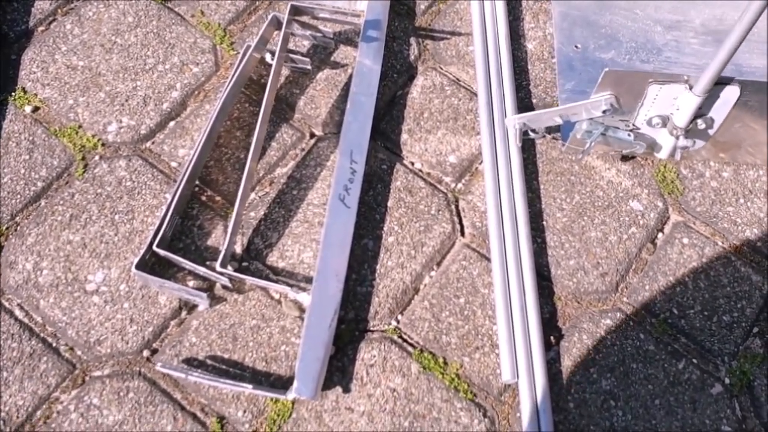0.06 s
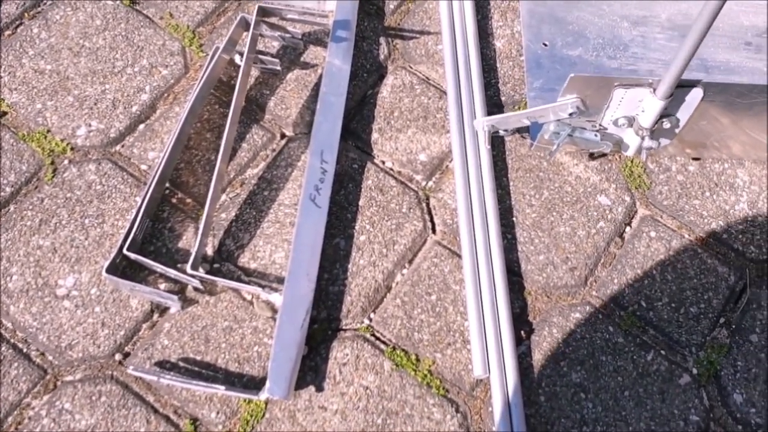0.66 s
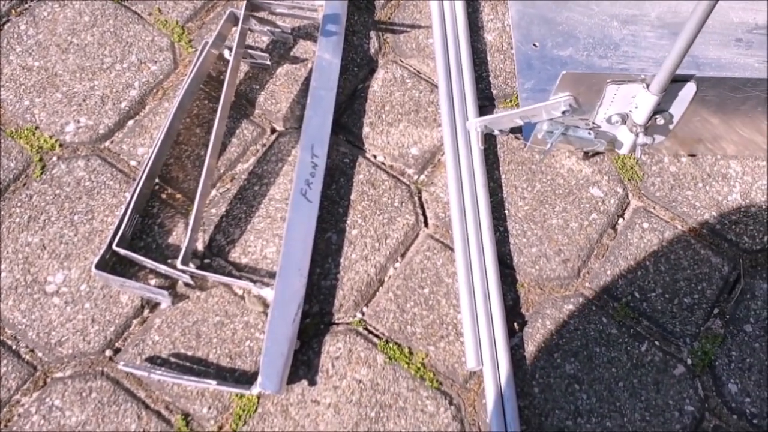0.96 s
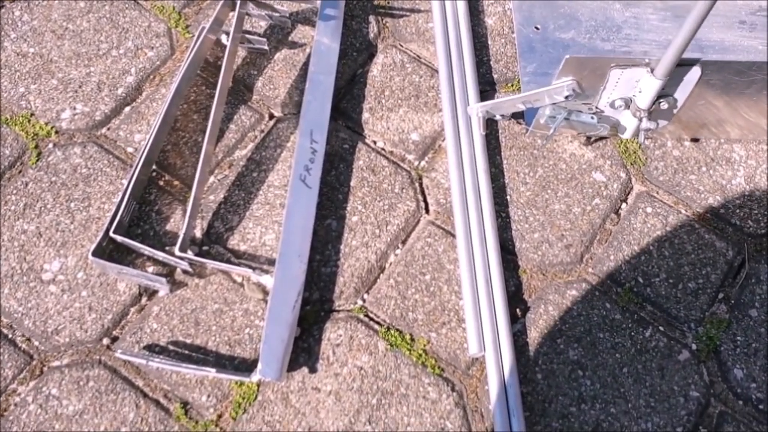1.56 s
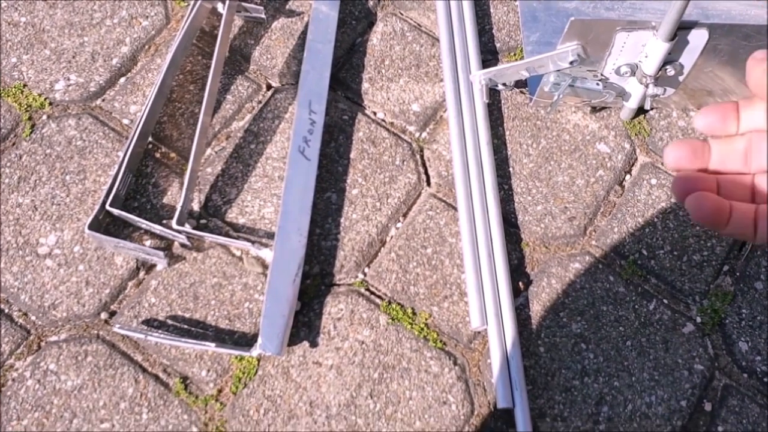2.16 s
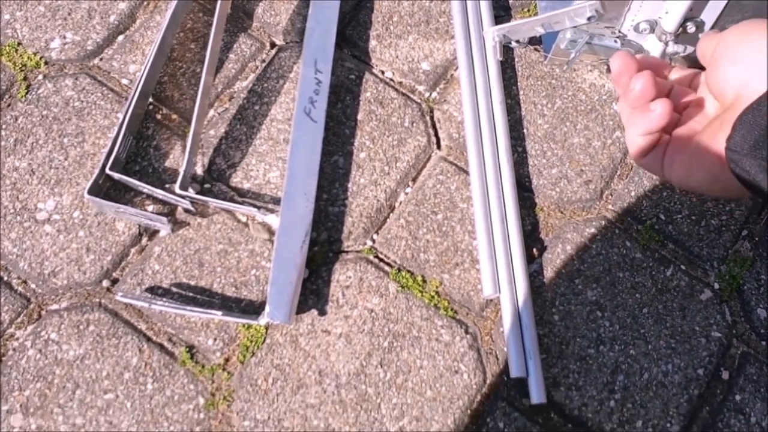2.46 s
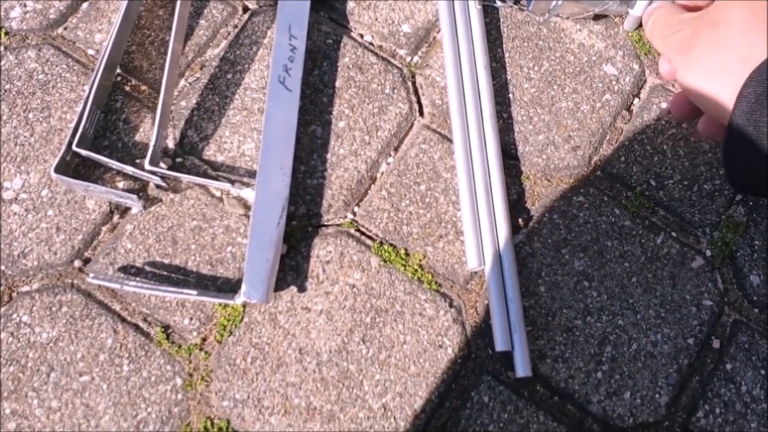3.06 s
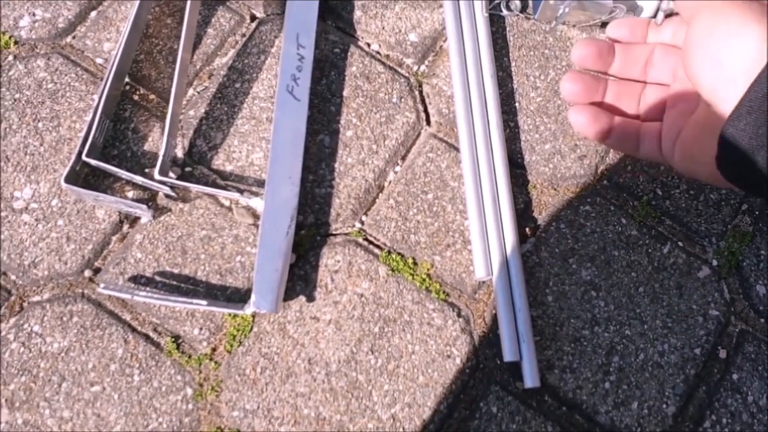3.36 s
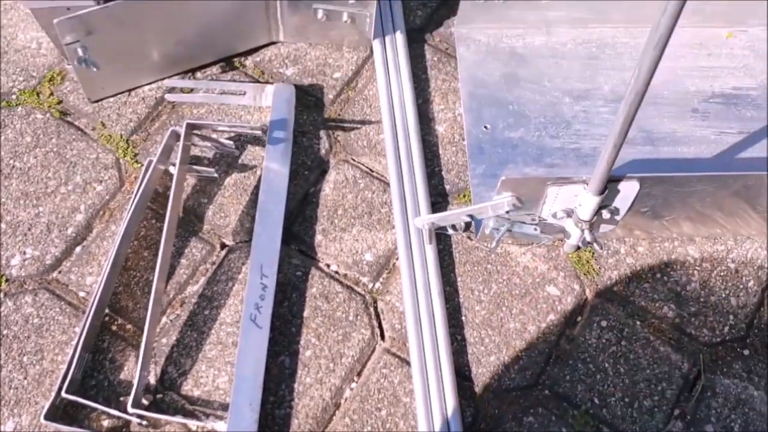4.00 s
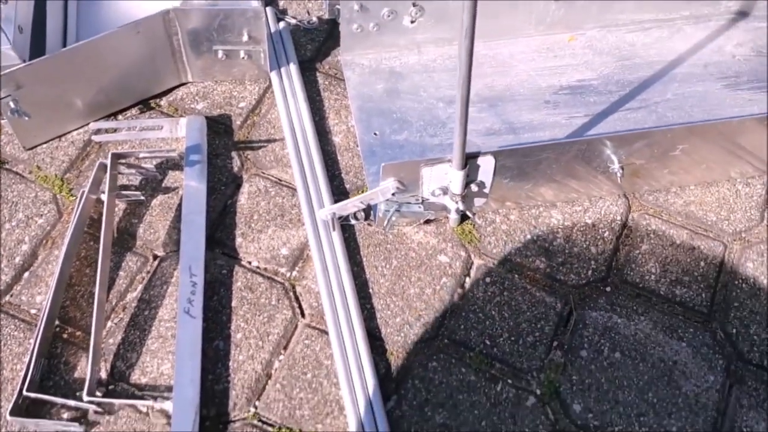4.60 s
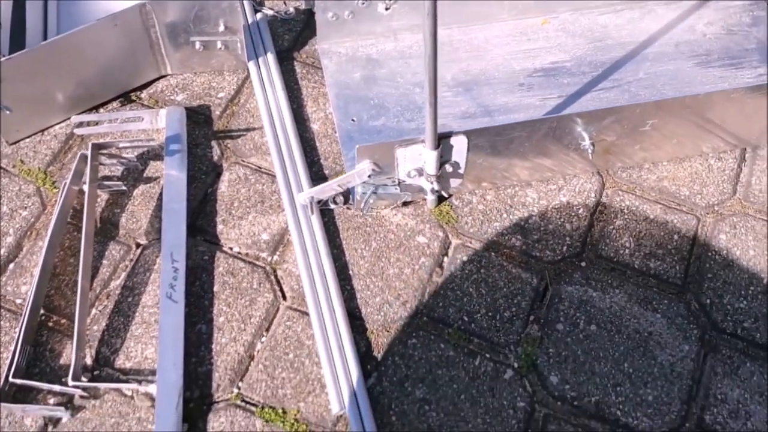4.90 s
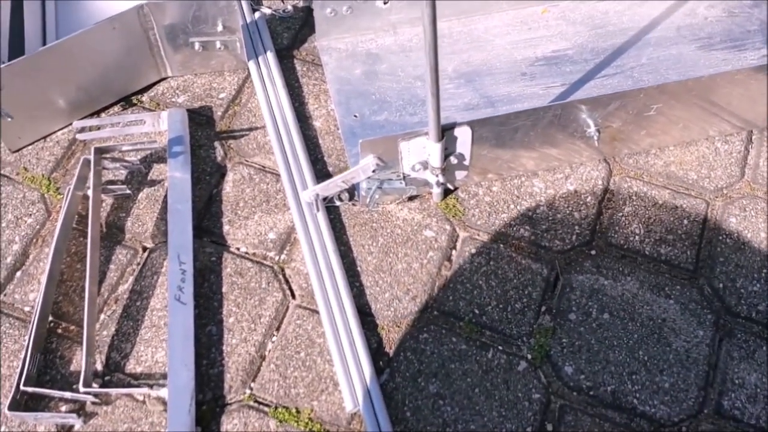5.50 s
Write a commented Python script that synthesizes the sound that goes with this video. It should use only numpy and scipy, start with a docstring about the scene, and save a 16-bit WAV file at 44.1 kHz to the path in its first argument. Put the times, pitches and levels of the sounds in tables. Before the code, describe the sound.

Close by, loose metal joints clank and scrape against sheet metal, and a leg squeaks briefly in its clamp. The knocking thickens into a loud rattle, stops for a moment and returns more softly. Then only the quiet outdoor background is left: low rumble with a puff of wind, a far motor's hum and a faint falling whistle, broken by a quick click of handling at the microphone.

```python
"""Outdoors on paving stones, the metal legs and brackets of a sluice are fitted close to a hand-held camera.
Loose joints knock against the sheet-metal trough and the metal rings. Each push makes it scrape and rattle, and
a leg squeaks as it sticks and slips in its clamp. Behind this are a low rumble with one puff of wind, the hum
of a far motor, light rubs of handling and soft bumps on the camera. Near the end faint noise comes up, a thin
whistle sinks and the camera's case clicks under the fingers."""
import sys
import numpy as np
from scipy import signal
from scipy.fft import rfft, irfft, next_fast_len
from scipy.io import wavfile
from scipy.ndimage import map_coordinates

SR = 44100
rng = np.random.default_rng(int(sys.argv[2]) if len(sys.argv) > 2 else 0)


def file_out(sig):
    """Save sig as 16-bit WAV at sys.argv[1]."""
    # one column per channel
    cols = np.atleast_2d(sig).T
    # limit, then scale
    lim = np.clip(cols, -1, 1)
    pcm = np.round(lim * 32767).astype(np.int16)
    wavfile.write(sys.argv[1], SR, pcm)


N = 249165

# How much louder the left side is than the right: (frequency [Hz], difference [dB])
LEFT_LOUDER = [(100, 3.5), (380, 6.5), (700, 1.5), (1150, 13), (2400, 9), (4500, 7), (8000, 0), (15000, -2)]
# How alike the two sides sound: (frequency [Hz], likeness [0 to 1])
STEREO_LIKENESS = [(40, 0.2), (200, 0.67), (400, 0.58), (1000, 0.52), (3000, 0.24), (12000, 0.053)]
# Tone colours of the rumble, the hiss and the late background noise: (frequency [Hz], relative level [dB])
RUMBLE_COLOUR = [(20, -11.5), (35, -5), (60, 1), (85, -2.5), (125, -10), (180, -19.5), (400, -27),
                 (900, -59)]
HISS_COLOUR = [(88, -31.5), (150, -22.5), (240, -9.5), (334, -16), (1170, -23), (5460, -30), (8000, -36.5),
               (10600, -27.5), (16000, -28.5)]
BACKGROUND_COLOUR = [(100, 20), (500, 4), (1200, 0.5), (2400, 3.5), (4200, -4.5), (6000, -16), (8000, -22),
                     (16000, -38)]
# Swells of the whistle: (middle time [s], half length [s], level [dB])
WHISTLE_SWELLS = [(4.067, 0.057, -73), (4.22, 0.037, -68), (4.41, 0.06, -72), (4.572, 0.055, -65),
                  (4.76, 0.051, -71), (4.941, 0.075, -72.5), (5.342, 0.034, -65), (5.548, 0.076, -65.5)]
# Light rubs of handling, and soft dull bumps on the camera's body: (middle time [s], length [s], frequency
# [Hz], width [Hz], level [dB])
RUBS_AND_BUMPS = [(0.025, 0.085, 1100, 355, -62), (0.027, 0.074, 3720, 3240, -64.5),
                  (0.315, 0.044, 2860, 3070, -59.5), (0.41, 0.044, 1100, 260, -58),
                  (2.715, 0.007, 251, 692, -54.5), (2.924, 0.32, 1068, 257.6, -70.5),
                  (3.044, 0.064, 2510, 3500, -63), (4.283, 0.026, 402, 1700, -56.5),
                  (4.625, .12, 2500, 1164, -67), (4.69, 0.088, 3270, 348, -66.5),
                  (4.726, 0.017, 500, 2190, -55.5), (4.795, 0.12, 5570, 503, -78),
                  (5.018, 0.37, 3500, 2590, -72), (5.501, 0.24, 600, 350, -66), (5.56, .13, 3800, 2000, -68)]
# Clicks of the camera's case: (time [s], level [dB], click length [s])
CASE_CLICKS = [(5.1194, -41, 0.00017), (5.128, -28, 0.00018), (5.1371, -32, 0.00016)]
# Tone colour of struck metal: (frequency [Hz], relative level [dB])
METAL_COLOUR = [(50, -23.5), (125, -8.5), (220, -5.5), (400, -4.5), (660, -4.5), (840, -9.5), (1020, -3),
                (1380, -13.5), (2300, -3.5), (3100, -1.5), (5200, -2.5), (7500, -19), (10500, -13.5),
                (16000, -23)]
# Fixed resonances that colour every knock and scrape: (frequency [Hz], width [Hz], relative level [dB])
FIXED_RESONANCES = [(447, 20, -6), (1112.5, 42, 14), (1603, 710, 10)]
# Narrow resonances of the legs and brackets: (frequency [Hz], level over the metal colour [dB])
LEG_RESONANCES = [(458, 7), (490, 7), (598, -9), (641, 4), (975, 8.5), (1222, 13.5), (1653, 16), (1771, 9),
                  (2148, -1), (2267, -2), (2321, -4), (2374, 10.5), (2859, 2.5), (3182, -15), (3526, 7.5),
                  (4549, 7.5), (4625, 7), (4754, -12), (5012, -6), (5421, -5), (5529, 3.5), (5604, -3.5)]
# A leg slips in its clamp: (middle time [s], half length [s], squeak level [dB], ring level [dB])
LEG_SLIPS = [(0.922, 0.034, -56.5, -61.5), (0.965, 0.01, -41, -55.5), (1.002, 0.0217, -45.5, -53.5),
             (1.149, 0.049, -62, -55.5)]
# High tones of the squeak: (frequency [Hz], waver [Hz], relative level [dB])
SQUEAK_TONES = [(4356, 31, 5.5), (5590, 65, -5.5), (7140, 81, -25), (8330, 70, -19), (9884, 77, -17),
                (11460, 140, -12), (13700, 90, -16)]
# Clean ringing tones of the leg: (frequency [Hz], waver [Hz], relative level [dB], time to fade 60 dB [s])
LEG_RING_TONES = [(3280, 9, -1.5, 0.62), (6400, 100, -23, 1.9)]
# Pushes that slide the loose parts: (start [s], length [s], level [dB], brightness [dB])
SLIDING_PUSHES = [(0.465, 0.262, -55.5, -15.5), (0.816, .35, -55, -3.5), (1.258, 0.051, -56.5, 2.5),
                  (1.394, 0.073, -50, -6), (1.632, .19, -44.5, -4), (1.85, 0.14, -33.5, -7.5),
                  (2.03, .06, -50, -6.5), (3.129, 0.14, -50.5, -2.5), (3.268, 0.148, -56, -3.5),
                  (3.454, 0.083, -45, -7.5), (3.647, 0.05, -52, 0), (3.758, .07, -58.5, 0),
                  (3.89, 0.0675, -48, -8)]
# Spots where the hands work: (start [s], cut on the right side [dB], tick level relative to the edge [dB])
HAND_SPOTS = [(0, 2.5, -11), (1.3, 0.5, -6), (2.5, -2, -7.5)]
# Borders between a knock's four bands, the thud, clank, bright edge and tick: (frequency [Hz])
BAND_BORDERS = [700, 2200, 7000]
# Metal knocks: (time [s], clank level [dB], thud over clank [dB], edge over clank [dB],
# time to fade 60 dB [s], frequency favoured by the point struck [Hz])
KNOCKS = [(0.313, -53, -8, -0.5, 0.19, 2280), (0.425, -40.5, -8.5, 2.5, 0.044, 4180),
          (0.451, -53.5, -14, 1, 0.26, 2450), (0.481, -27, -8.5, 0, 0.089, 2330),
          (0.489, -25, -10.5, -13.5, 0.059, 1300), (0.5, -30.5, -13, -2.5, 0.24, 1124),
          (0.549, -44, 3, 13, 0.055, 5700), (0.593, -32.5, -11.5, -9.5, 0.11, 1120),
          (0.634, -35, -14, -6, 0.058, 1120), (0.648, -48, 1, 14.5, 0.049, 3190),
          (0.677, -49, -10, 7, 0.037, 3240), (0.733, -60.5, -14, 3.5, 0.077, 3070),
          (0.811, -34, -11.5, -7, 0.15, 1500), (0.822, -32.5, -6.5, -1, 0.13, 1040),
          (1.032, -35, -6, -6, 0.11, 2030), (1.041, -31.5, -7, -4, 0.032, 1535),
          (1.07, -57.5, 0, 13.5, 0.35, 3290), (1.317, -42, -7.5, 7, 0.035, 4280),
          (1.642, -35.5, -2.5, 1, 0.43, 3660), (1.654, -33.5, -7, 6.5, 0.12, 2570),
          (1.702, -25, -14.5, -15.5, 0.074, 1090), (1.729, -39.5, -15, 4, 0.3, 3800),
          (1.792, -34, -17, -3, 0.37, 2050), (1.84, -21.5, -6, -2, 0.26, 497),
          (1.857, -19, -12.5, -15, 0.13, 1050), (1.913, -21.5, -13, 0, 0.095, 4850),
          (1.922, -21.5, -6.5, 0.5, 0.21, 4780), (1.954, -21, 2, 1, .1, 563),
          (1.969, -21.5, -24, -1, 0.11, 1120), (1.987, -22.5, -15.5, 0.5, 0.16, 4750),
          (2.027, -28, -5.5, 3.5, 0.041, 4570), (2.065, -43, -15, 5, 0.13, 4900),
          (2.108, -28.5, -6, -4, 0.15, 1210), (2.118, -25.5, -22, -15, 0.041, 1190),
          (2.154, -41.5, 3, 9, 0.041, 4780), (2.21, -43, -5.5, 1.5, 0.092, 1795),
          (2.256, -44.5, -10, -0.5, 0.065, 4630), (2.61, -50.5, -23, 2, 0.084, 2980),
          (3.143, -30, -9, -16, .11, 935), (3.178, -51, 6, 14, .08, 3870),
          (3.209, -45, -10, 3.5, .07, 3740), (3.232, -47, -4, 4, 0.076, 3900),
          (3.463, -35, -16, -10, 0.15, 1970), (3.471, -33.5, -4.5, -3, 0.077, 2000),
          (3.5, -48, 1, 10, 0.18, 3850), (3.738, -41.5, -12, -1, 0.15, 1200),
          (3.753, -42, -10, 2, 0.23, 940), (3.761, -26, -11, -9, .1, 860),
          (3.781, -33.5, -41, -12.5, 0.11, 1130), (3.812, -54, -11, 13, 0.044, 1880),
          (3.879, -51, -21, 7, .1, 870), (3.901, -34, -14.5, -8, 0.14, 1006),
          (3.937, -45, -18, 7.5, 0.071, 3960), (3.958, -41, -8, 1, 0.021, 1100)]


def amp(db):
    """Turn decibels into a gain."""
    return 10 ** (np.asarray(db) / 20)


def unit(x):
    """Scale a signal to an average (rms) size of 1."""
    return x / np.sqrt(np.mean(x ** 2) + 1e-20)


def along(points, hz):
    """Read between a table's (frequency, value) points on a log frequency axis."""
    point_hz, values = np.transpose(points)
    return np.interp(np.log(hz + 1), np.log(point_hz + 1), values)


def during(start, end, fade_s=0.032):
    """1 from start to end, fading to 0 outside."""
    t = np.arange(N) / SR
    return np.clip(np.minimum(t - start, end - t) / fade_s + 1, 0, 1)


def swell(middle, half_length):
    """A bell-shaped rise and fall."""
    return np.exp(-((np.arange(N) / SR - middle) / half_length) ** 2)


def wobble(rate, size=N):
    """A smooth curve through `rate` random values a second."""
    coarse = np.arange(0, size, 16)
    curve = map_coordinates(rng.standard_normal(size // 8), [coarse * rate / SR], mode="wrap")
    return np.interp(np.arange(size), coarse, curve)


def frequencies(size):
    """The frequency of each point in a spectrum."""
    return np.fft.rfftfreq(size, 1 / SR)


def peaks(resonances, hz):
    """Power curve of resonances given as (frequency [Hz], width [Hz], level [dB])."""
    return sum(amp(db) ** 2 / (1 + (2 * (hz - centre) / width) ** 2) for centre, width, db in resonances)


def stereo_spectra(size, lag_ms=0.16):
    """Spectra of partly alike noise at two microphones; the left one hears it a little later."""
    hz = frequencies(size)
    shared, opposed = rfft(rng.standard_normal((2, size)))
    angle = np.arccos(np.clip(along(STEREO_LIKENESS, hz), -1, 1)) / 2
    side = np.array([[1], [-1]])
    delay = np.exp(-1j * np.pi * hz * side * lag_ms / 1000)
    balance = amp(side * along(LEFT_LOUDER, hz) / 2)
    return (np.cos(angle) * shared + side * np.sin(angle) * opposed) * delay * balance


def noise(colour):
    """Stereo noise of size 1, shaped by the gain colour(hz)."""
    size = next_fast_len(N)
    return unit(irfft(stereo_spectra(size) * colour(frequencies(size)), size)[:, :N])


def add(track, time, sound):
    """Mix a sound into the track at a time in seconds."""
    part = track[:, max(round(time * SR), 0):][:, :sound.shape[1]]
    part += sound[:, :part.shape[1]]


def outdoors(rumble_db=-60, gust_db=8, hum_hz=64.3, hum_db=-64, hiss_db=-74):
    """A low rumble that one puff of wind lifts, the hum of a far motor and a soft, even hiss."""
    rumble_level = amp(rumble_db + 2 * wobble(9) + gust_db * swell(middle=4.424, half_length=0.17))
    rumble = rumble_level * noise(lambda hz: amp(along(RUMBLE_COLOUR, hz)))
    hum = unit(np.sin(2 * np.pi * np.cumsum(hum_hz + wobble(6)) / SR))
    hum *= amp(hum_db + 2 * wobble(1.1))
    hiss = amp(hiss_db) * noise(lambda hz: amp(along(HISS_COLOUR, hz)))
    return rumble + hum * amp([[1], [-1]]) + hiss


def background_rise(start_s=3.95, level_db=-67.5):
    """Faint, uneven background noise comes up once the knocking stops."""
    level = amp(level_db + 2 * wobble(12)) * during(start_s, N / SR)
    return level * noise(lambda hz: amp(along(BACKGROUND_COLOUR, hz)))


def whistle(start_s=4.05, pitch_hz=2055, sink_hz_per_s=140, lift_hz=30, held_db=-73):
    """A faint, rough tone sinks steadily; now and then it swells and its pitch lifts a little."""
    level = amp(held_db) * during(start_s, WHISTLE_SWELLS[-1][0])
    level += sum(amp(db) * swell(time, half_length) for time, half_length, db in WHISTLE_SWELLS)
    pitch = pitch_hz - sink_hz_per_s * (np.arange(N) / SR - start_s)
    pitch += lift_hz * (level / level.max() - 0.5)
    waver_hz = 55 * wobble(600) + 28 * wobble(35)
    tone = unit(np.sin(2 * np.pi * np.cumsum(pitch + waver_hz) / SR))
    roughness = unit(amp(4 * wobble(110)))
    flutter = amp(6 * wobble(30))
    return roughness * level * flutter * tone * amp([[3], [-9]])  # mostly on the left


def rubs_and_bumps(rough_db=3, rough_rate=140):
    """Light strokes of handling and soft bumps on the camera swell and fade, each one a single band of noise."""
    size = 2 ** 15
    t, hz, out = np.arange(size) / SR, frequencies(size), np.zeros((2, N))
    for middle, length, centre, width, db in RUBS_AND_BUMPS:
        start = max(middle - size / SR / 2, 0)
        stroke = np.exp(-2 * ((start + t - middle) / length) ** 2)
        colour = peaks([(centre, width, 0)], hz) / (1 + (hz / 6000) ** 6)
        add(out, start, amp(db) * stroke * unit(irfft(stereo_spectra(size) * colour, size)))
    return out * unit(amp(rough_db * wobble(rough_rate)))


def case_clicks(case_hz=105, fade_s=0.037, attack_s=0.00069, cutoff_hz=3300):
    """The camera's case clicks under the fingers, then swings back in one dull bounce."""
    t, out = np.arange(2 ** 12) / SR, np.zeros((2, N))
    bounce = np.cos(2 * np.pi * case_hz * t) * amp(-4 - 60 * t / fade_s) * (1 - np.exp(-t / attack_s))
    for time, db, length in CASE_CLICKS:
        click = 2 * t / length * np.exp(1 - 2 * t / length)
        add(out, time, amp(db) * (bounce - click) * amp([[2], [-2]]))
    return signal.sosfilt(signal.butter(2, cutoff_hz, fs=SR, output="sos"), out)


def metal(hz, leg_width_hz=13):
    """How strong the metal sounds are at each frequency: a broad colour with resonances on top."""
    legs = [(centre, leg_width_hz, db) for centre, db in LEG_RESONANCES]
    return amp(along(METAL_COLOUR, hz)) * np.sqrt(1 + peaks(FIXED_RESONANCES, hz) + peaks(legs, hz))


def leg_squeak(hiss_db=-21, flutter_db=2, ring_attack_s=0.014):
    """A leg sticks and slips, sounding high tones over a rubbing hiss; it rings on after each slip."""
    def tone(hz, waver_hz, rate):
        return np.sin(2 * np.pi * np.cumsum(hz + waver_hz * wobble(rate)) / SR)

    t = np.arange(N) / SR
    slip = sum(amp(db) * swell(time, half_length) for time, half_length, db, _ in LEG_SLIPS)
    tones = slip * unit(sum(amp(db + flutter_db * wobble(180)) * tone(hz, waver_hz, rate=500)
                            for hz, waver_hz, db in SQUEAK_TONES))
    for hz, waver_hz, db, fade_s in LEG_RING_TONES:
        ring_power = np.zeros(N)
        for time, _, _, ring_db in LEG_SLIPS:
            ring = amp(ring_db - 60 * np.maximum(t - time, 0) / fade_s)
            ring_power += ring ** 2 * during(time, N / SR, ring_attack_s)
        tones += amp(db) * np.sqrt(ring_power) * unit(tone(hz, waver_hz, rate=72))
    hiss = noise(metal) * slip ** 0.6 * amp(hiss_db + flutter_db * wobble(200))
    return tones * amp([[2], [-3]]) + hiss


def rattle(hits_per_s=70, spread_db=2.5, fade_s=0.06, attack_s=0.002, count=768):
    """Loudness curve of loose parts colliding at random moments; each hit dies away quickly."""
    gaps = rng.exponential(size=count)
    strengths = amp(spread_db * rng.standard_normal(count))
    starts = (np.cumsum(gaps) / hits_per_s * SR).astype(int)
    power = np.bincount(starts, strengths ** 2, N)[:N]
    t = np.arange(2 ** 12) / SR
    hit = amp(-60 * t / fade_s) * (1 - np.exp(-t / attack_s))
    return unit(np.sqrt(np.abs(signal.fftconvolve(power, hit ** 2)[:N])))


def scrape(scrape_db=-3, rattle_db=-4, grit_db=-10, attack_s=0.011, release_db_per_s=131):
    """Each push rises, holds and dies away: sliding metal catches on tiny bumps and loose parts rattle."""
    t, force, brightness = np.arange(N) / SR, np.zeros(N), np.zeros(N)
    for start, length, db, bright_db in SLIDING_PUSHES:
        rise = np.clip((t - start) / attack_s, 0, 1)
        push = rise * amp(db - release_db_per_s * np.maximum(t - start - length, 0))
        force = np.maximum(force, push)
        brightness = np.maximum(brightness, push * amp(bright_db))
    catches = unit(amp(2.5 * wobble(200)))
    sliding = amp(scrape_db) * noise(lambda hz: metal(hz) / (1 + (hz / 4500) ** 4))
    clinks = amp(rattle_db) * noise(lambda hz: metal(hz) * hz / (hz + 2000))
    grit = noise(lambda hz: amp(along(METAL_COLOUR, hz)) * (1 - 1 / (1 + (hz / 8500) ** 10)))
    return force * catches * sliding + brightness * (rattle() * clinks + amp(grit_db) * grit)


def knocks(struck_width_hz=85, struck_db=6, chatter_db=2.2, ring_s=0.29, crack_s=0.041, attack_s=0.0021):
    """Loose joints hit the trough and ring the same resonances at new strengths; harder hits tick more."""
    size = 2 ** 14
    t, hz, out = np.arange(size) / SR, frequencies(size), np.zeros((2, N))
    body = metal(hz)
    below_border = [1 / (1 + (hz / border) ** 10) for border in BAND_BORDERS]
    bands = np.diff([0 * hz, *below_border, 0 * hz + 1], axis=0)  # thud, clank, edge, tick
    crack_share = np.array([0.0044, 0.46, 1, 0.93])[:, None, None]  # the first crack is mostly treble
    crack = crack_share * amp(-2 - 60 * t / crack_s)
    tail = amp(-17 - 60 * t / ring_s)
    for time, db, thud_db, edge_db, fade_s, struck_hz in KNOCKS:
        _, right_cut_db, tick_db = [spot for spot in HAND_SPOTS if spot[0] <= time][-1]
        colour = body * np.sqrt(0.5 + peaks([(struck_hz, struck_width_hz, struck_db)], hz))
        rings = irfft(stereo_spectra(size) * colour * bands[:, None], size) * amp([[0], [-right_cut_db]])
        blow = amp(-60 * t / fade_s)
        chatter = amp(chatter_db * wobble(350, size))  # tiny rebounds in the loose joint
        chatter /= np.sqrt(np.average(chatter ** 2, weights=blow ** 2))
        shape = np.sqrt((blow * chatter) ** 2 + tail ** 2 + crack ** 2) * (1 - np.exp(-t / attack_s))
        band_power = np.average(np.mean(rings ** 2, axis=1), axis=1, weights=shape[:, 0] ** 2)
        rings /= np.sqrt(band_power)[:, None, None]  # even out the bands, then give each its strength
        strength = amp(db + np.array([thud_db, 0, edge_db, tick_db + 0.99 * edge_db]))
        add(out, time, np.sum(strength[:, None, None] * rings * shape, axis=0))
    return out


def scene():
    """All the sounds together, in stereo."""
    handling = knocks() + scrape() + rubs_and_bumps() + leg_squeak() + case_clicks()
    return handling + whistle() + background_rise() + outdoors()


def record(dry, top_hz=16000):
    """The camera keeps nothing above its highest frequency."""
    size = next_fast_len(N + SR // 2)
    return irfft(rfft(dry, size) * (frequencies(size) < top_hz), size)[:, :N]


dry = scene()
out = record(dry)
file_out(out)
```